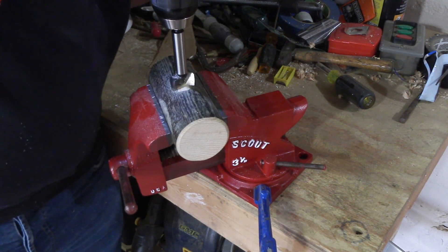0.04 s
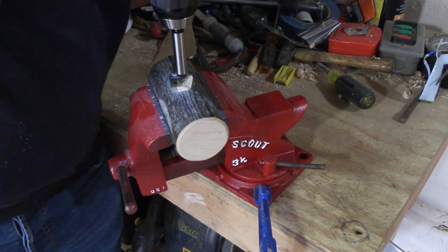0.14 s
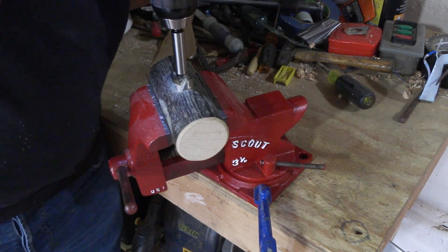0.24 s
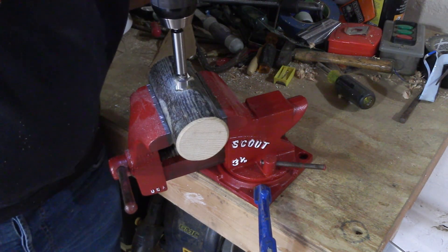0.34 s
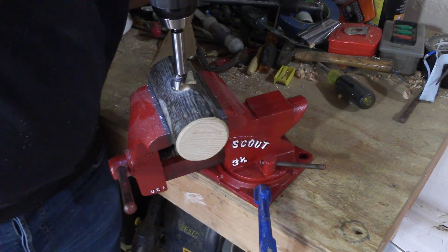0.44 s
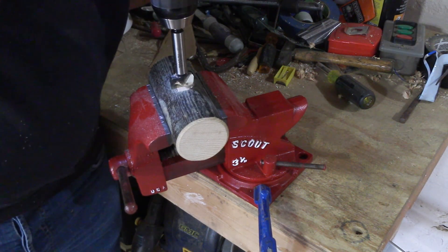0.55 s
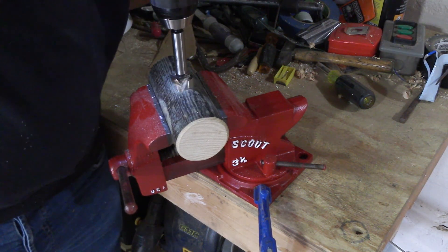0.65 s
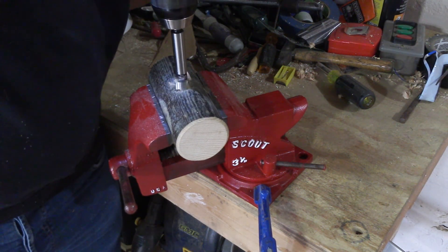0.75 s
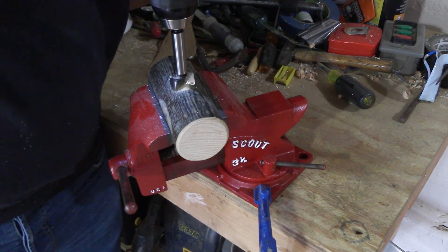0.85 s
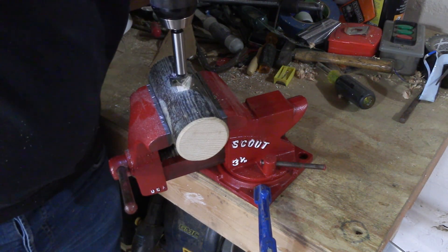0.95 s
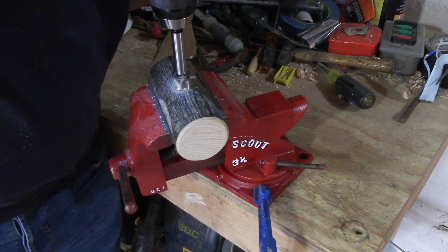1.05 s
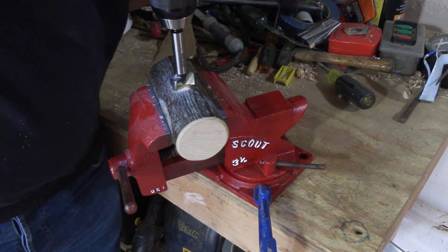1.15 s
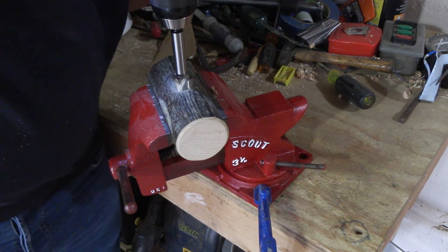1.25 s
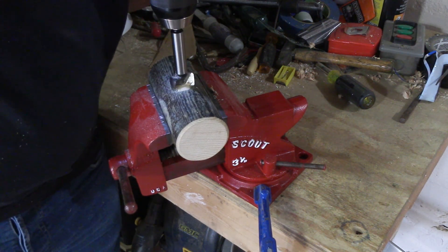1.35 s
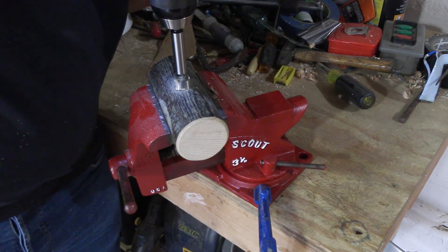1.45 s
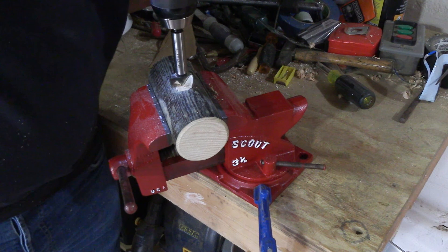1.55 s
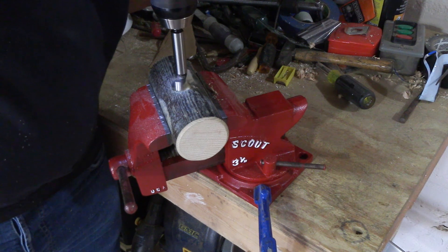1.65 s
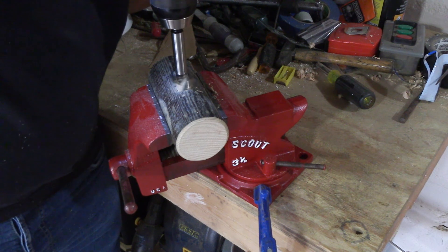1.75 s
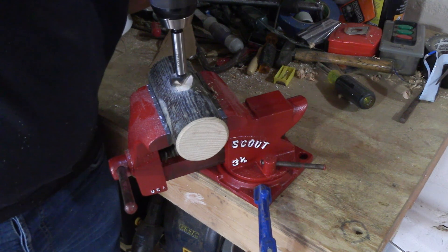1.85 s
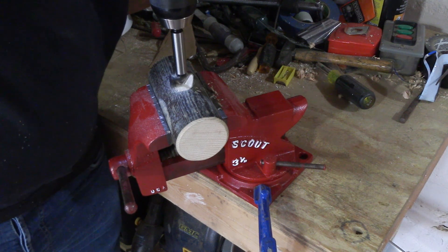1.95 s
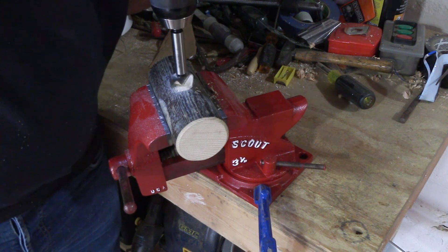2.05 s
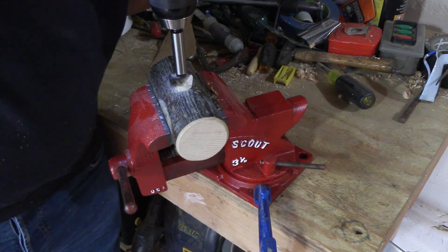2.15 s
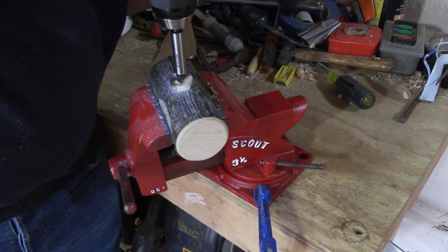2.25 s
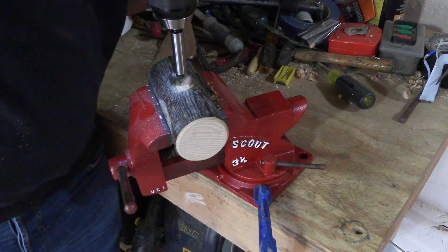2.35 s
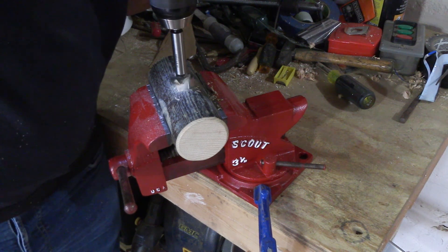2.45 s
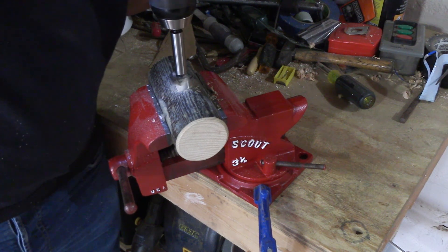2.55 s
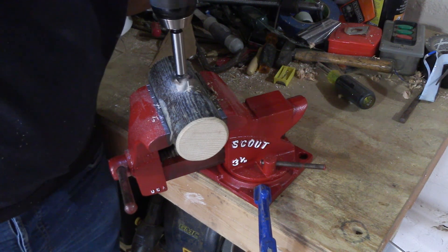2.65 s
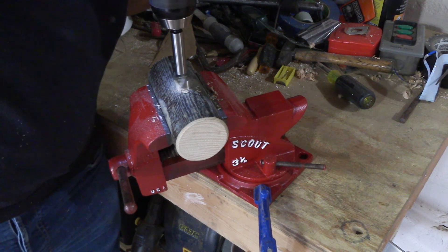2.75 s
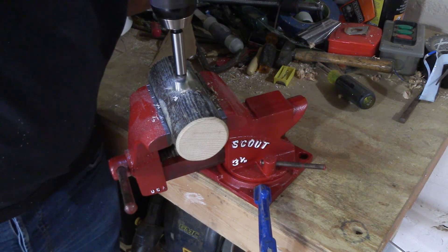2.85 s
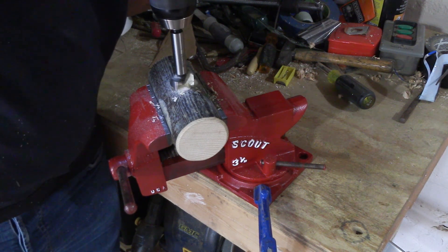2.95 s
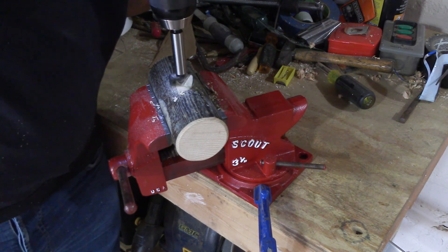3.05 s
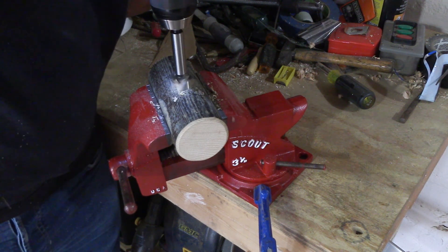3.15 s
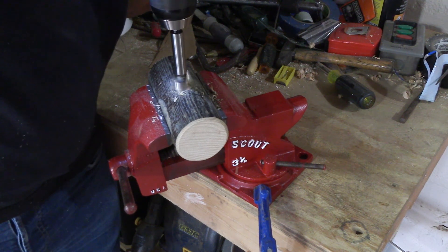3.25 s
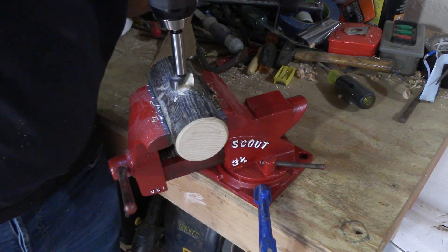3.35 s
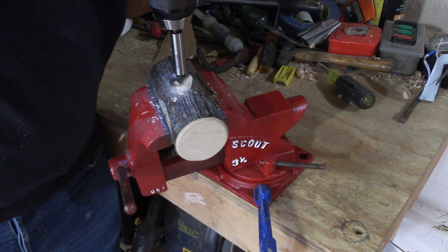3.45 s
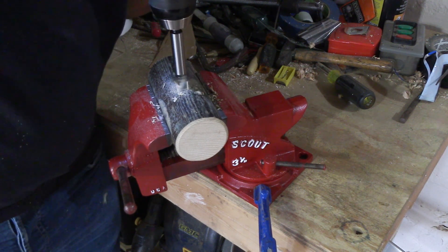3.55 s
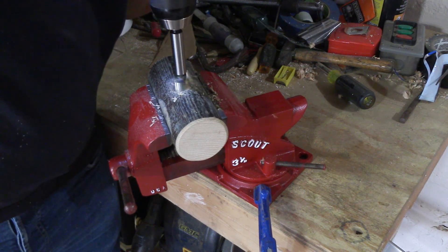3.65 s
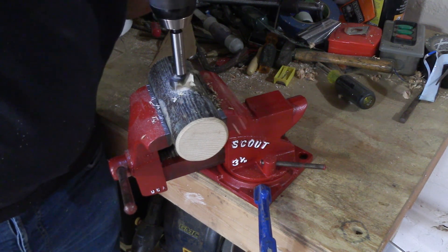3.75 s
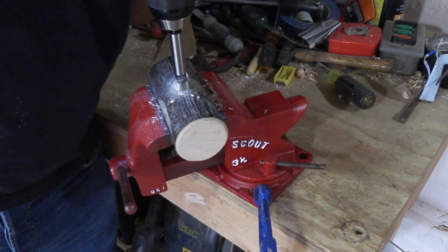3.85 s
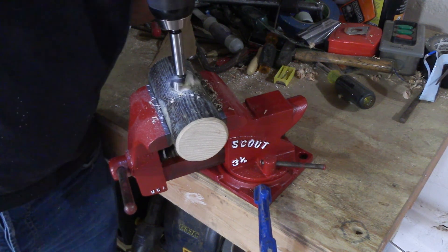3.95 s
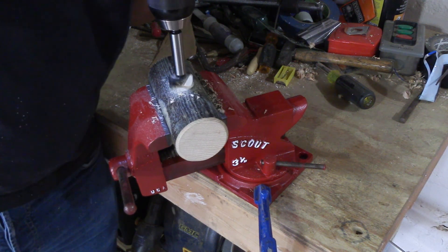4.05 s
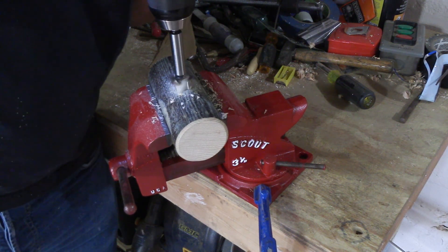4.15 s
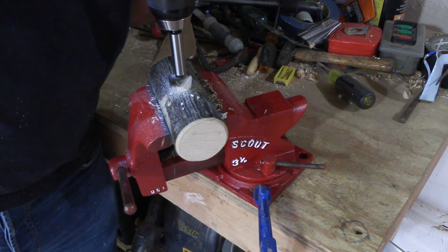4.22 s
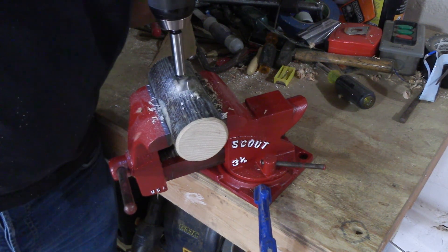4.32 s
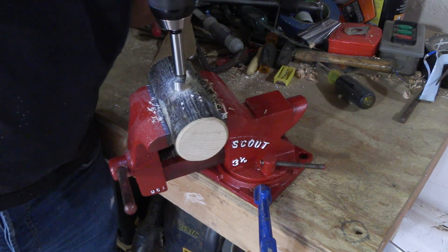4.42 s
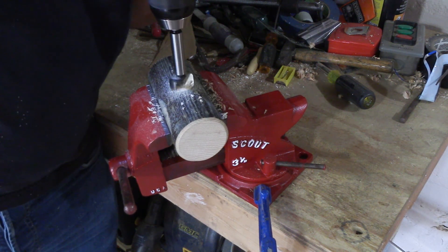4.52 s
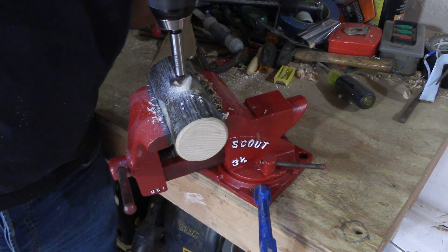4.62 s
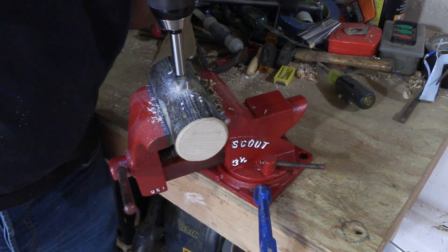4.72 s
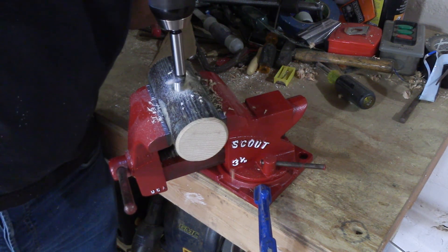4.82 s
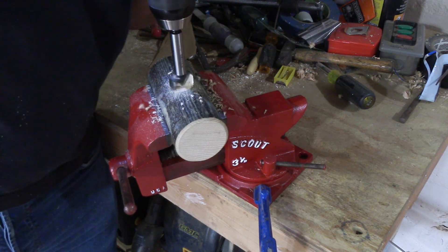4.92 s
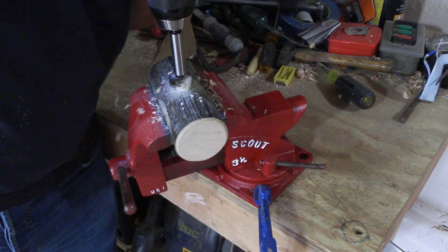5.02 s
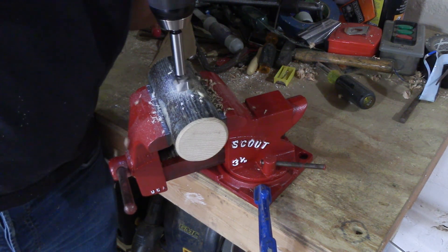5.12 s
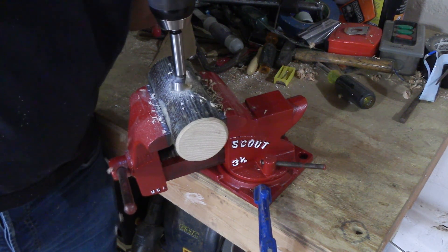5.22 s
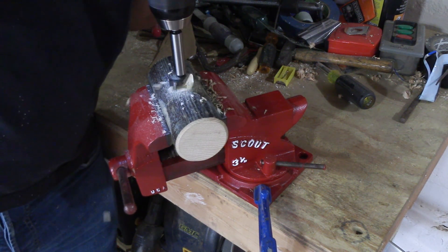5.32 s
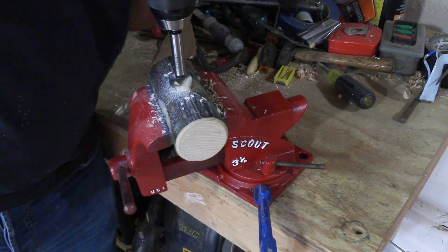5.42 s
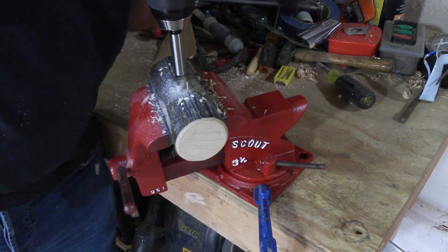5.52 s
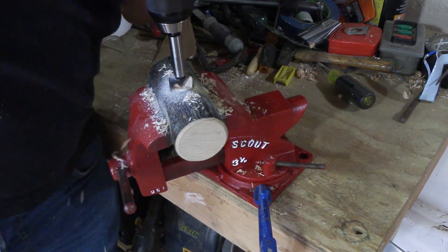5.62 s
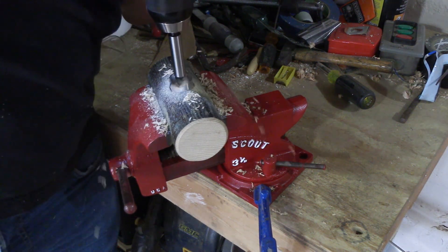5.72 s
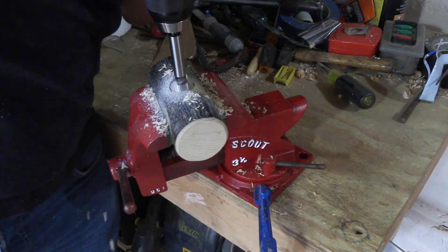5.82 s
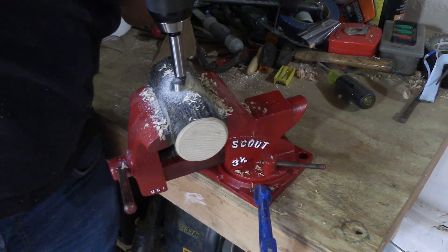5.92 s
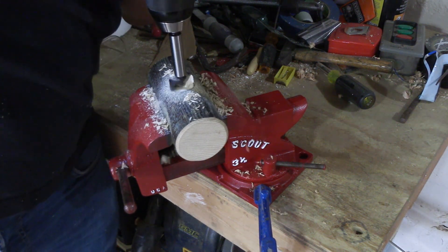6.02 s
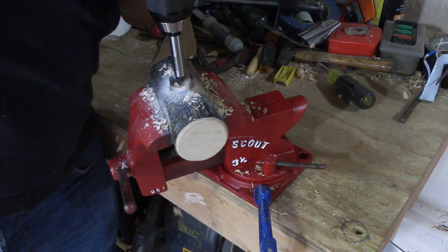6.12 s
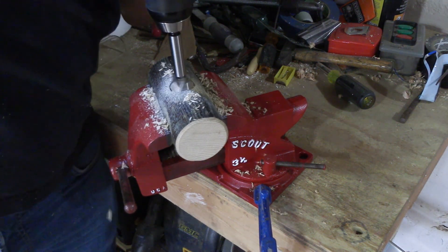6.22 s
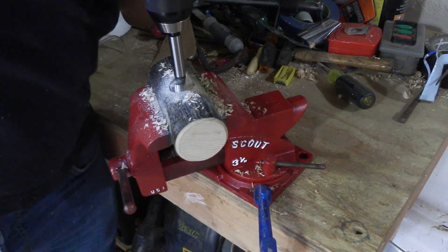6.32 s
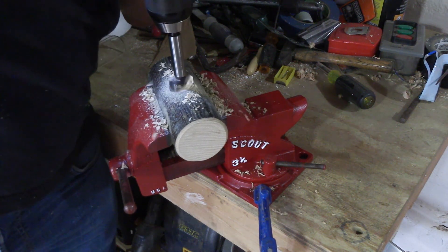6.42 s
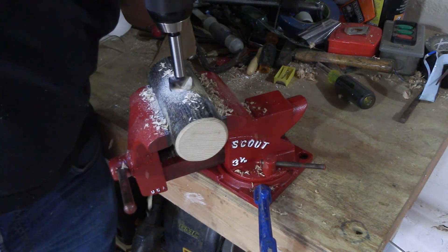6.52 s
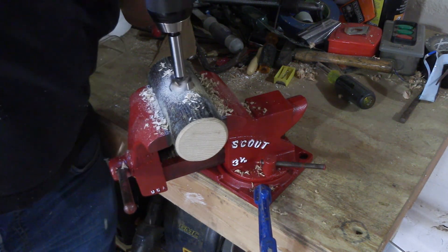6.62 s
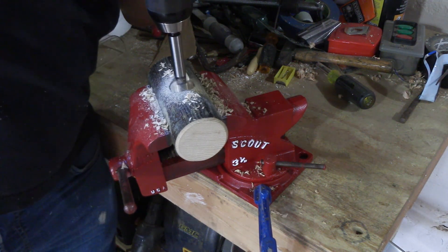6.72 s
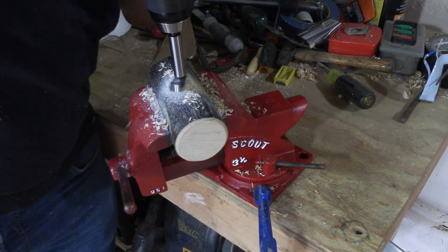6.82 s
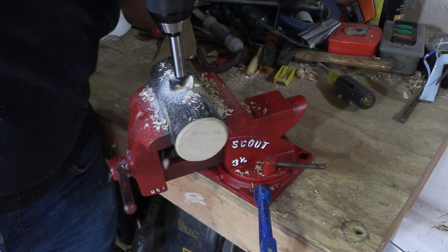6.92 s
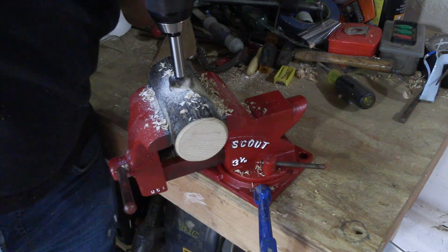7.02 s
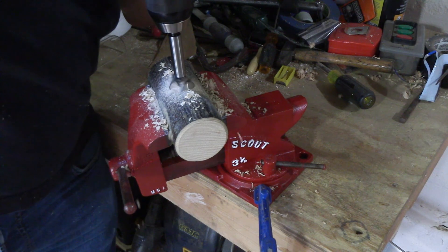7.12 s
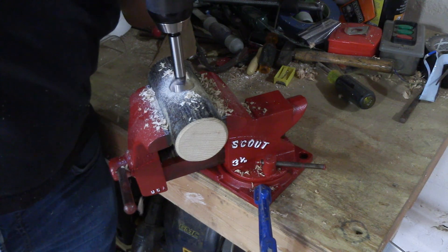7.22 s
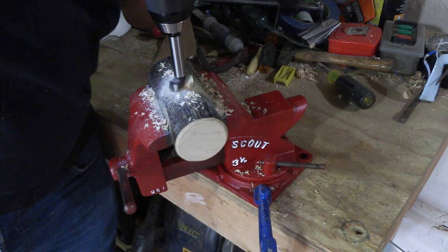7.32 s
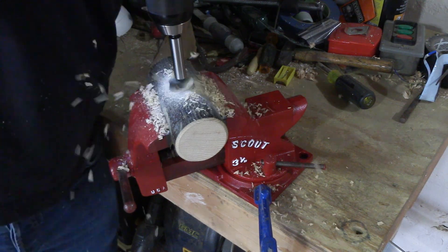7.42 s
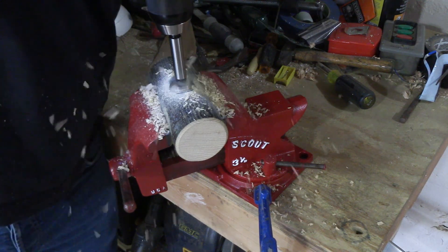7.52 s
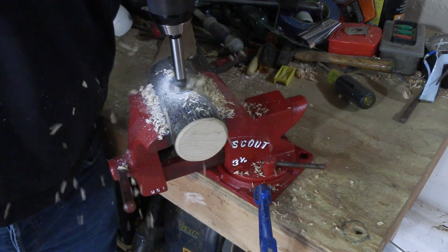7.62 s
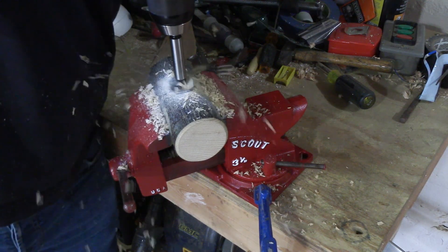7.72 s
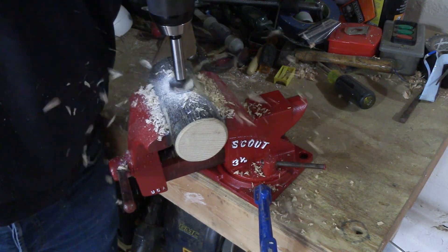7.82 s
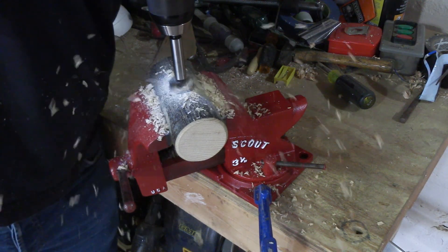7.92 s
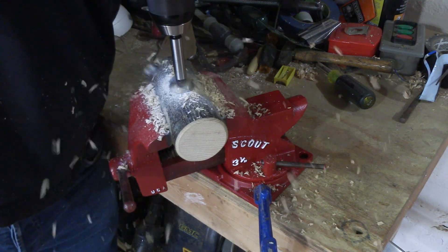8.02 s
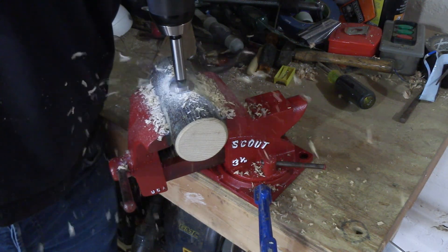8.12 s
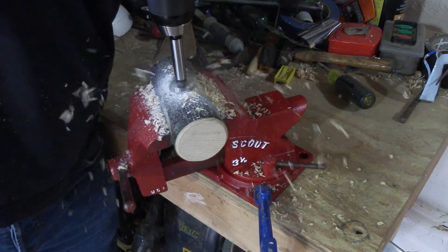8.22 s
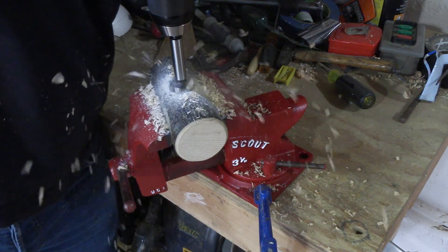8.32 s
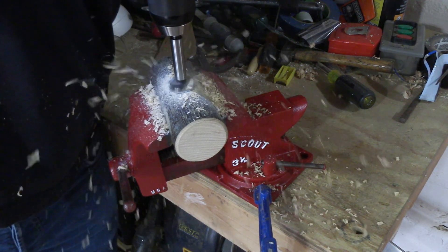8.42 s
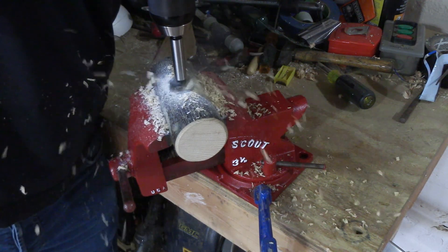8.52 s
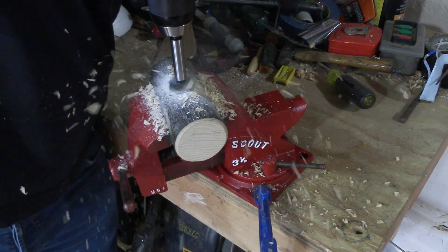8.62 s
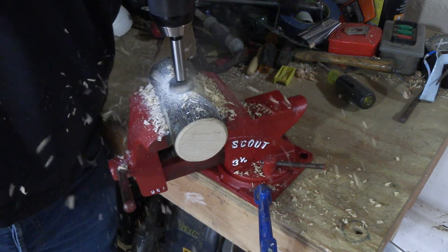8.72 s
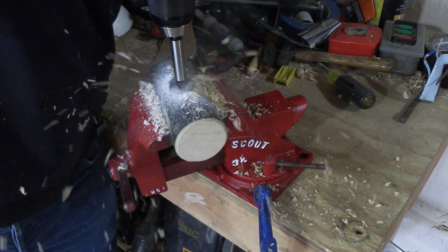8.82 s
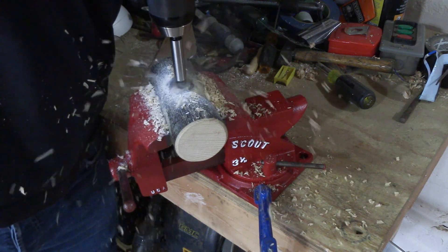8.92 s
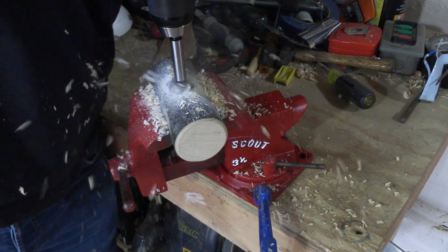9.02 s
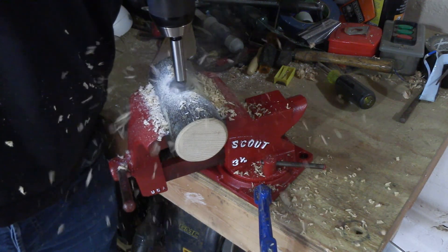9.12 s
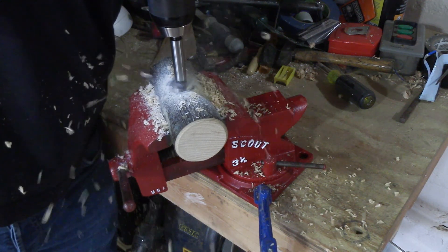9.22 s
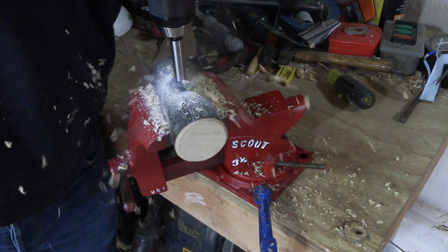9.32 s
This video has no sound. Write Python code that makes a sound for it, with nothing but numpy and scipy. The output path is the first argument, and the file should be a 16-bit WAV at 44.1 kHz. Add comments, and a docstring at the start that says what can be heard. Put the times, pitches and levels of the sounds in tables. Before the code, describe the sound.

A cordless drill starts slowly and climbs in steps to a high motor and gear whine, the bit squealing lightly twice on bark. It briefly brakes, and the sound jumps straight to steady boring into a clamped log, with rushing air and scraping chips. After two more abrupt shifts, the pitch drops and the wood and bench rumble as the bit goes deep. It is heard close up in a quiet workshop.

```python
"""A cordless drill is squeezed up to speed in steps and bores into a log clamped on a workbench.
Its motor and gears sing on multiples of the shaft speed, over the rush of fan air and chips.
The speed switch whistles faintly and the bit skids twice on the bark. The sound jumps three times
to a later part of the job; in the last one the bit is deep and the log and bench rumble."""
import sys
import numpy as np
from scipy import signal
from scipy.fft import rfft, irfft
from scipy.io import wavfile
from scipy.ndimage import uniform_filter1d

SR = 44100
rng = np.random.default_rng(int(sys.argv[2]) if len(sys.argv) > 2 else 0)


def output_pcm(signal):
    """Save a mono or channel-first signal as 16-bit PCM at the path in sys.argv[1].

    Samples are clipped to [-1, 1] before scaling.
    """
    pcm = np.clip(np.atleast_2d(signal).T, -1, 1) * 32767
    wavfile.write(sys.argv[1], SR, np.round(pcm).astype(np.int16))


N = 412776
TIME = np.arange(N) / SR
COARSE = TIME[::64]  # fewer time points, for things that change slowly
GEAR = 60  # shaft turns for one turn of the bit
TREBLE_HZ, TOP_HZ = 10100, 15660  # many tones fade above the first; all stop at the second

# The stages of the job: (time [s], stage number). 0 speeding up, 1 part trigger, 2 full trigger,
# 3 scoring the bark, 4 cutting, 5 boring deep
STAGES = [(1.72, 0), (1.9, 1), (2.76, 1), (2.95, 2), (3.895, 2), (3.91, 3), (5.6, 3), (5.625, 4),
          (7.474, 4), (7.486, 5)]
# The four parts between jumps: (start [s], shaft speed [Hz], speed lost under load [Hz per s])
PARTS = [(0, 0, 0), (3.9, 378.6, 2.9), (5.612, 367, 3.4), (7.48, 324, 4.5)]
# Brief level changes at the jumps: (time [s], width [s], whole drill [dB], extra for tones [dB])
JUMPS = [(3.897, 0.015, -0.5, -7), (5.612, 0.0072, -3, 3), (7.478, 0.0066, -2.5, 1)]
# The leading tones of gears and rotor: (multiple of shaft speed)
LEAD_ORDERS = [.75, 2.25, 2.8125, 3, 4, 10, 11.25, 15, 20, 22.5, 30, 33.75, 40]
# The high overtones of the whine: (multiple of shaft speed)
HIGH_WHINE_ORDERS = [45, 50, 56.25, 60, 70, 75, 82, 90, 101.25, 120, 130]


def gain_of(db):
    """Turns decibels into a factor to multiply by."""
    return 10 ** (np.asarray(db) / 20)


def evened(x):
    """Scales a signal to an average size (rms) of 1."""
    return x / np.sqrt(np.mean(x ** 2) + 1e-20)


def curve(points, t=TIME):
    """Joins (time, value) points with straight lines."""
    return np.interp(t, *np.transpose(points))


def spectrum(points, hz):
    """Joins (frequency, value) points along a log-frequency axis."""
    f, value = np.transpose(points)
    return np.interp(np.log(hz + 1), np.log(f + 1), value)


def bump(x, centre, width, power=2):
    """A smooth hill of height 1; a higher power flattens its top."""
    return np.exp(-((x - centre) / width) ** power)


def by_stage(values, t=COARSE):
    """Takes one value for each stage and blends them over time."""
    return np.interp(curve(STAGES, t), range(len(values)), values)


def part_at(t):
    """Which part of the job is playing at time t."""
    return np.searchsorted(np.transpose(PARTS)[0, 1:], t)


def drift(fastest_hz, t=COARSE):
    """A random wander of average size 1, made of ten sine waves."""
    rates = np.geomspace(fastest_hz / 20, fastest_hz, num=10)
    return evened(sum(np.sin(2 * np.pi * (f * t + rng.random())) / np.sqrt(f) for f in rates))


def coloured(x, gain):
    """Makes each frequency louder or softer by gain(frequency)."""
    return irfft(rfft(x) * gain(np.fft.rfftfreq(N, 1 / SR)), N)


def resonate(x, hz, width):
    """Makes x ring around one pitch; filtering twice cuts the rest more steeply."""
    peak = signal.iirpeak(hz, hz / width, SR)
    return evened(signal.lfilter(*peak, signal.lfilter(*peak, x)))


def room_and_hum(room_db=-44.5):
    """Quiet room noise, and the drill body humming against the hand at low speed."""
    # (frequency [Hz], relative level [dB])
    room_colour = [(30, -59), (68, -3.5), (95, -24), (130, -7.5), (2500, -12.5), (15000, -52)]
    hum_levels = [(.55, -49.5), (.75, -39), (1.0, -49), (2.1, -70)]  # (time [s], level [dB])
    air = rng.standard_normal(N)
    hum = gain_of(curve(hum_levels)) * resonate(air, hz=130, width=16)
    room = evened(coloured(air, lambda hz: gain_of(spectrum(room_colour, hz))))
    return hum + gain_of(room_db) * room


def switch_whistle(hz=15337):
    """While the drill speeds up, the speed switch chops the current, which makes a thin whistle that fades away
    by about 1.2 s."""
    fade = [(0, -47), (1.05, -49), (1.2, -60), (2, -86)]  # (time [s], level [dB])
    return np.sqrt(2) * gain_of(curve(fade)) * np.sin(2 * np.pi * hz * TIME)


def skid(slips_per_s=900):
    """Uneven slips of steel on bark make the bit squeal."""
    # The two skids: (time [s], level [dB])
    levels = [(.2, -41), (.25, -29), (.4, -26.5), (.5, -55), (1.05, -62), (1.1, -23), (1.16, -60)]
    bit_rings = [(2580, 160, -3), (3070, 260, -0.5)]  # (pitch [Hz], width [Hz], relative level [dB])
    slips = rng.standard_normal(N) * (rng.random(N) < slips_per_s / SR)
    squeal = sum(gain_of(db) * resonate(slips, hz, width) for hz, width, db in bit_rings)
    return gain_of(np.interp(TIME, *np.transpose(levels), -120, -120)) * squeal


def brake():
    """The trigger is let go and the motor brakes with a short falling chirp."""
    # (time [s], shaft speed [Hz], level [dB])
    slowing = [(3.88, 364, -60), (3.885, 357, -18), (3.899, 294, -14), (3.903, 273, -25), (3.91, 240, -50)]
    multiples = [10, 30]  # (multiple of shaft speed)
    tone_db = [0, -6]  # (relative level [dB])
    times, hz, level_db = np.transpose(slowing)
    turns = np.cumsum(np.interp(TIME, times, hz)) / SR
    chirp = sum(gain_of(db) * np.sin(2 * np.pi * k * turns) for k, db in zip(multiples, tone_db))
    return gain_of(np.interp(TIME, times, level_db, -120, -120)) * chirp


def bench_and_scrape():
    """The cutting edges shake log, vice and bench into a hum; the bit's rim scrapes the hole."""
    rings = [(237.5, 20, 0.5), (375.6, 8.4, -16)]  # (pitch [Hz], width [Hz], relative level [dB])
    hum_db = [-33, -31.5, -34, -61, -32, -30]  # by stage: (relative level [dB])
    scrape_db = [-19, -14.5, -36, -13.5, -8, -12.5]  # by stage: (relative level [dB])
    shake = rng.standard_normal(N)
    hum = sum(gain_of(db) * resonate(shake, hz, width) for hz, width, db in rings)
    waver_db = 0.93 * np.interp(TIME, COARSE, drift(12))
    scrape = gain_of(by_stage(scrape_db, TIME) + waver_db) * resonate(shake, hz=6770, width=1160)
    return gain_of(by_stage(hum_db, TIME)) * hum + scrape


def rush(turns, flicker_db=0.5, throb=0.069):
    """Fan air, gear rattle and chips: patchy noise that throbs once for each shaft turn."""
    # The noise, one list for each stage: (frequency [Hz], relative level [dB])
    colours = [
        [(40, -14), (126, -17), (377, -7.5), (778, -5.5), (974, 0), (1860, -7.5), (2060, -1.5), (2990, -1),
         (3740, -1.5), (6640, -1), (8110, -7), (11800, -14), (15500, -30)],
        [(40, -25), (179, -14), (229, -35), (387, -9.5), (622, -11), (704, -6), (1250, -0.5), (1730, -10),
         (3070, -1), (3740, -5), (4690, -1), (9420, -5), (15500, -25)],
        [(40, -40), (368, -11.5), (687, -9.5), (740, -8), (1130, -0.5), (1730, -10), (2990, -1.5), (3930, -5.5),
         (7340, -1), (10700, -11.5), (11500, -11.5), (13700, -24), (15500, -76)],
        [(40, -57), (266, -13.5), (325, -25), (368, -13.5), (687, -13.5), (1130, -6), (1770, -14), (2920, -5.5),
         (3740, -9.5), (6640, -4.5), (11500, -14), (14000, -29), (15500, -74)],
        [(40, -32), (317, -19.5), (359, -11.5), (670, -9), (722, -7), (1450, -5), (1730, -14.5), (2990, -2.5),
         (3840, -1), (6640, -8), (9000, -3.5), (11200, -16), (13700, -27), (15500, -90)],
        [(40, -14.5), (108, -41), (174, -13.5), (229, -12), (325, -7), (438, -4.5), (549, -7.5), (1910, -0.5),
         (4030, -1.5), (6320, -2.5), (11500, -13.5), (13700, -24), (15500, -44)],
    ]
    stage_db = [-1.5, -3.5, -4, -4, -3.5, -2]  # (relative level [dB])
    # Narrow dips in the rushing noise: (frequency [Hz], width [Hz], change [dB])
    dips = [(3850, 350, -5.5), (5850, 250, -3), (8050, 300, -4), (10300, 450, -2.5)]
    frames, hz = N // 256 + 5, np.fft.rfftfreq(1024, 1 / SR)
    t = np.arange(frames) * 256 / SR
    real, imaginary, patches = rng.standard_normal((frames, 513, 3)).T
    patches = uniform_filter1d(patches, size=14, axis=0)  # smooth over frequency, then over time
    patches_db = evened(uniform_filter1d(patches, size=10, axis=1))
    shapes = [spectrum(points, hz) for points in colours]
    shapes = np.array([db - 20 * np.log10(np.linalg.norm(gain_of(db))) for db in shapes])  # equal power
    level_db = by_stage(stage_db, t)
    colour_db = np.array([by_stage(db, t) for db in shapes.T]) + level_db
    colour_db += sum(db * bump(hz, f, width) for f, width, db in dips)[:, None]
    treble = np.clip(hz / 5000, 0, 1)[:, None]  # the high frequencies flicker together
    colour_db += patches_db + flicker_db * treble * drift(25, t)
    noise = signal.istft((real + 1j * imaginary) * gain_of(colour_db), nperseg=1024, noverlap=768)[1]
    return evened(noise[:N]) * gain_of(np.mean(level_db)) * (1 + throb * np.cos(2 * np.pi * turns))


def follow(t, start, length, lag):
    """A ramp from 0 to 1 that the heavy rotor follows a little late."""
    since_start, since_end = np.maximum(t - start, 0), np.maximum(t - start - length, 0)
    behind = lag * (np.exp(-since_end / lag) - np.exp(-since_start / lag))
    return (since_start - since_end - behind) / length


def shaft_speed(t, hand_lag_s=0.0208):
    """Shaft turns per second: the trigger raises them, the load and the hand change them."""
    # The trigger is squeezed in small steps: (time [s], shaft speed [Hz])
    spin_up = [(0, 48), (.06, 49.2), (.2, 64.7), (.43, 66.3), (.5, 73.8), (.6, 80.7), (.7, 83.4),
               (.78, 83.9), (.88, 87.3), (1.04, 89.8), (1.08, 97.6), (1.12, 118.7), (1.16, 135.7),
               (1.2, 146.9), (1.26, 156.9), (1.43, 174.7), (1.53, 178.5), (1.7, 185.4), (1.75, 192.3),
               (1.8, 222.3), (1.85, 248.2), (1.95, 289), (2.02, 303.5), (2.15, 310.9), (2.3, 313),
               (2.5, 313.5)]
    # Then further: (time [s], speed gained [Hz], length [s], rotor lag [s])
    squeezes = [(2.689, 62.5, .03, .099)]
    # The hand leans or eases off: (time [s], speed change [Hz], length [s])
    leans = [(3.419, -2.5, 0.27), (3.849, -7.5, 0.03), (3.95, -1.23, .35), (5.797, 2.5, 0.26),
             (7.55, -12, 0.2), (7.881, 2, 0.0767), (8.085, -1.5, 0.39), (8.949, 2.5, .3)]
    starts, start_hz, sag = np.transpose(PARTS)
    part = part_at(t)
    hz = start_hz[part] - sag[part] * (t - starts[part]) + curve(spin_up, t) * (part == 0)
    for at, change, length, lag in squeezes + [(*row, hand_lag_s) for row in leans]:
        hz += change * follow(t, at, length, lag) * (part == part_at(at))
    return hz


def grain_ripple(twice_share=.7, twice_lag_cycles=.22):
    """The wood grain brakes the bit at the same places in each turn; gives the shaft's change in Hz."""
    # For each part: (time near a peak [s], once a turn [Hz], four times a turn [Hz])
    ripples = [(3.076, .36, 0), (3.915, .45, 0), (5.645, .45, 0), (7.837, .1, .55)]
    turns = np.cumsum(shaft_speed(TIME)) / SR
    at, once, four = np.transpose(ripples)[:, part_at(TIME)]
    bit_angle = 2 * np.pi * (turns - np.interp(at, TIME, turns)) / GEAR
    twice = twice_share * np.cos(2 * bit_angle - 2 * np.pi * twice_lag_cycles)
    return once * (np.cos(bit_angle) + twice) + four * np.cos(4 * bit_angle)


def housing_lift(hz, chatter, treble_db_per_khz=-5):
    """The change in dB as the housing boosts tones near its own pitches and dulls the highest."""
    # (pitch [Hz], width [Hz], boost [dB], extra at full chatter of the bit [dB])
    rings = [(322, 92, 5.5, -11), (637, 200, 9, -3.5), (1110, 580, 12, -8), (1410, 240, 10.5, -4),
             (2850, 430, 12, 5.5), (3280, 370, 0.5, 14), (4880, 1200, 9.5, -15), (6450, 430, 14, 2),
             (7080, 290, 8.5, 10), (8745, 570, 15.5, -5.5)]
    power = 1 + sum(gain_of(2 * (db + extra_db * chatter)) / (1 + (2 * (hz - f) / width) ** 2) ** 2
                    for f, width, db, extra_db in rings)
    return 10 * np.log10(power) + treble_db_per_khz * np.maximum(hz - TREBLE_HZ, 0) / 1e3


def cutting_buzz(hz, edge_passes=8 / GEAR, log_boost_db=8, waver_db=2.0):
    """Lists the buzzing tones of the cutting edges; the log boosts those near its own pitch."""
    # (multiple of the edges' passing rate, relative level [dB])
    overtones = [(5, -26), (6, -21), (7, -24), (9, -23), (10, -26), (11, -25), (12, -26), (15, -30)]
    stage_db = [-15, -27, -22, -27.5, -26, -1.5]  # (relative level [dB])
    for overtone, db in overtones:
        k = overtone * edge_passes
        yield k, by_stage(stage_db) + db + log_boost_db * bump(k * hz, centre=442, width=30), waver_db


def shaft_tones(hz, chatter, waver_db, chatter_db=2):
    """Lists the tones of the unbalanced shaft, which grow with speed; chatter roughens the lower set."""
    # The whole multiples of shaft speed that the whine leaves free
    low_multiples = [k for k in range(1, 34) if k not in LEAD_ORDERS]
    high_multiples = [k for k in range(34, 61) if k not in LEAD_ORDERS + HIGH_WHINE_ORDERS]
    # Each set by stage: (relative level [dB])
    low_db = [-35, -31.5, -31, -30.5, -28, -33.5]
    high_db = [-30, -43, -50, -50, -58, -52]
    slow_db = np.minimum(25 * np.log10(hz / 170), 0)
    for k in low_multiples:
        rough_db = chatter_db * chatter * drift(120)
        yield k, by_stage(low_db) + housing_lift(k * hz, chatter) + slow_db + rough_db, waver_db
    for k in high_multiples:
        yield k, by_stage(high_db) + slow_db, waver_db


def high_whine(hz, waver_db):
    """Lists the high overtones of the whine, which get weaker as their pitch rises."""
    stage_db = [-15.5, -25, -60, -60, -60, -50]  # (relative level [dB])
    for k in HIGH_WHINE_ORDERS:
        fall_db = (k * hz + 4 * np.maximum(k * hz - TREBLE_HZ, 0)) / 1e3  # 1 dB per kHz, then 5
        yield k, by_stage(stage_db) - fall_db, waver_db


def motor_whine(hz, chatter, waver_db, lift_share=.25, usual_lift_db=8):
    """Lists the leading tones of gears and rotor, a little weaker while the shaft turns slowly."""
    # A row for each tone, a column for each stage: (relative level [dB])
    levels = [(-36, -21, -33, -34, -30, -18), (-45, -40, -45, -45, -45, -24),
              (-20, -36, -40, -40, -40, -40), (-27, -25, -23, -24, -34, -23),
              (-28, -16, -21, -19, -23, -26), (-16, -10, -23, -30, -27, -15),
              (-23, -37, -30, -27, -27, -15), (-20, -11, -14, -16, -29, -9),
              (-18, -17, -12.5, -23, -20, -19), (-16, -21, -33, -23, -27, -17), (-14, -10, -5, -6, -9, -15),
              (-17, -35, -45, -45, -50, -40), (-16, -27, -50, -50, -60, -29)]
    slow_db = -3 * np.clip((140 - hz) / 20, 0, 1)
    for k, stage_db in zip(LEAD_ORDERS, levels):
        lift_db = lift_share * (np.maximum(housing_lift(k * hz, chatter), 0) - usual_lift_db)
        yield k, by_stage(stage_db) + slow_db + lift_db, waver_db


def tones(turns, wobble_turns=0.002):
    """Plays each listed tone (multiple, level [dB], waver [dB]) as a sine on the wobbling shaft."""
    bit_chatter = [0.16, 0.15, 0.083, 0.26, 0.62, 0.57]  # by stage: (share [0-1])
    # Single tones swell or fade: (time [s], half length [s], multiple of shaft speed, change [dB])
    swells = [(.32, .2, 10, 4), (.75, .2, 10, 6), (.36, .13, 33.75, 11), (.58, .13, 40, 5),
              (.93, .16, 40, 13), (.85, .25, 11.25, 8), (.95, .12, 70, 10), (1.088, .045, 22.5, 17.5),
              (1.45, .25, 30, 3), (1.35, .22, 50, 8), (1.42, .17, 20, 7), (1.83, .14, 15, -9),
              (1.83, .08, 22.5, 10), (1.88, .17, 10, 7), (1.98, .17, 1, 7), (2.5, .22, 1, -10),
              (2.4, .5, 28, -7), (5.2, 2.4, 17, -4), (2.85, .15, 10, -5), (2.88, .12, 15, -5),
              (5.85, .3, 1, 4), (4.2, .25, 4, -5), (4.8, .8, 8, -6), (5.2, .95, 15, 5.5), (7.7, .3, 2, -6),
              (2.4, .35, 11, 7), (7.9, .45, 30, 3), (8.5, 1, 28, -7), (7.6, .2, .8, -7),
              (7.67, .17, 1.2, 9), (8.05, .55, 1.47, -5)]
    turns = turns + wobble_turns * np.interp(TIME, COARSE, drift(60))
    hz, chatter = shaft_speed(COARSE), by_stage(bit_chatter)
    speeding_up = by_stage([1, 0, 0, 0, 0, 0])
    spurts_db = 2.4 * speeding_up  # the tones break up while the drill speeds up
    glide_db = -.3 * abs(np.gradient(hz, COARSE)) / 1e3 * speeding_up  # and weaken as they glide
    jump_db = sum(db * bump(COARSE, at, width, power=4) for at, width, _, db in JUMPS)
    voices = [*motor_whine(hz, chatter, waver_db=.5 + spurts_db / 3),
              *shaft_tones(hz, chatter, waver_db=.93 + spurts_db),
              *high_whine(hz, waver_db=.93 + spurts_db),
              *cutting_buzz(hz)]
    sound = np.zeros(N)
    for k, base_db, waver_db in voices:
        swell_db = sum(db * bump(COARSE, at, half, power=4)
                       for at, half, multiple, db in swells if abs(multiple - k) < .01)
        flutter_db = 1.3 if 1 <= k < 4.5 else .6  # low multiples flutter most
        level_db = base_db + swell_db + k * glide_db + jump_db - 100 * (k * hz > TOP_HZ)
        level_db += waver_db * drift(18) + flutter_db * drift(45)
        wave = np.cos(2 * np.pi * (k * turns + rng.random()))
        sound += np.interp(TIME, COARSE, gain_of(level_db)) * wave
    return np.sqrt(2) * sound


def drill():
    """One shaft drives tones and rush; they share one loudness with the bench and the scrape."""
    # (time [s], level [dB])
    loudness = [(0.0, -39.5), (0.07, -24.5), (0.23, -23.5), (1.77, -17), (1.93, -14.5), (2.68, -14),
                (2.84, -11.5), (9.36, -14)]
    turns = np.cumsum(shaft_speed(TIME) + grain_ripple()) / SR
    level_db = curve(loudness) + sum(db * bump(TIME, at, width) for at, width, db, _ in JUMPS)
    return gain_of(level_db) * (tones(turns) + rush(turns) + bench_and_scrape())


def scene(echo_s=.3, deep_spread_db=-19):
    """The sound leans a little to one side; echoes off bench and clutter differ left and right."""
    # (frequency [Hz], left over right [dB])
    balance = [(100, 0), (250, 1.8), (500, 1.3), (1000, 1.6), (2000, 0), (8000, -.8), (12000, -.2)]
    # The echoes: (frequency [Hz], side level against the middle [dB])
    spread = [(40, -40), (90, -17), (230, -29), (370, -14.5), (1200, -10), (1900, -19), (3200, -22),
              (7000, -11.5), (13000, -10.5)]
    mid = drill() + brake() + skid() + switch_whistle() + room_and_hum()
    tail = rng.standard_normal(12000) * gain_of(-60 * np.arange(12000) / SR / echo_s)
    echoes = signal.oaconvolve(mid, tail / np.linalg.norm(tail))[:N]
    side = coloured(mid, lambda hz: np.tanh(spectrum(balance, hz) * np.log(10) / 40))
    side += coloured(echoes, lambda hz: gain_of(spectrum(spread, hz)))
    deep = by_stage([0, 0, 0, 0, 0, 1], TIME)  # deep in the hole the sound spreads wider
    side += deep * coloured(echoes, lambda hz: gain_of(deep_spread_db) * bump(hz, 3700, width=2400))
    return np.array([mid + side, mid - side])


def record(dry, bass_hz=50, ceiling=1.1):
    """The microphone drops the deep bass and rounds the highest peaks; then the top treble is cut."""
    thin = signal.sosfilt(signal.butter(4, bass_hz, "highpass", fs=SR, output="sos"), dry)
    rounded = ceiling * np.tanh(thin / ceiling)
    lowpass = signal.firwin(511, TOP_HZ, window=("kaiser", 9), fs=SR)
    return signal.oaconvolve(rounded, lowpass[None], "same")


dry = scene()
out = record(dry)
output_pcm(out)
```